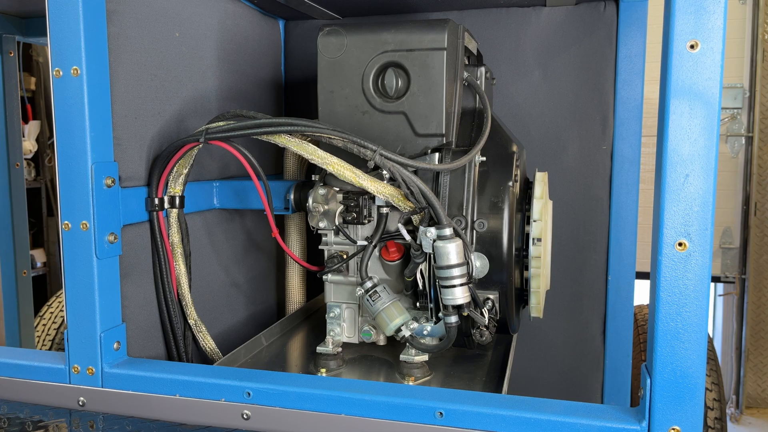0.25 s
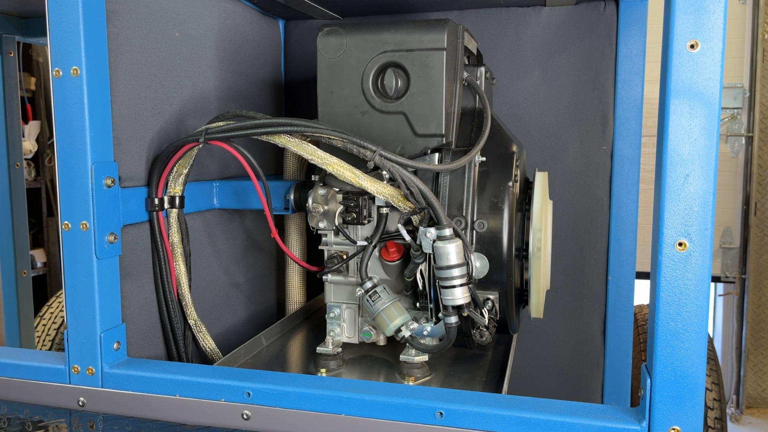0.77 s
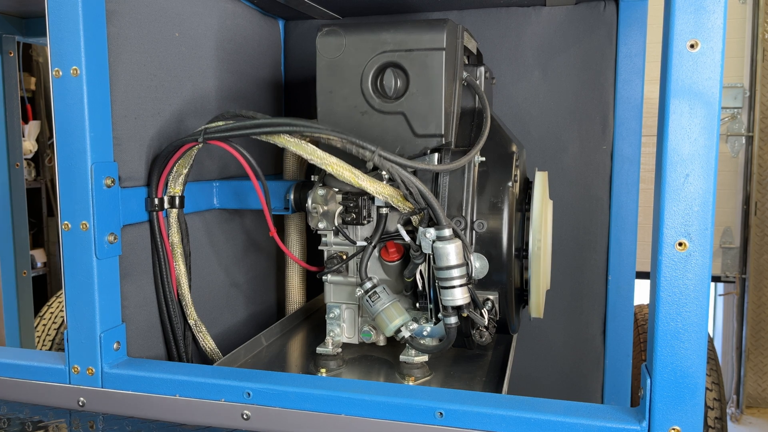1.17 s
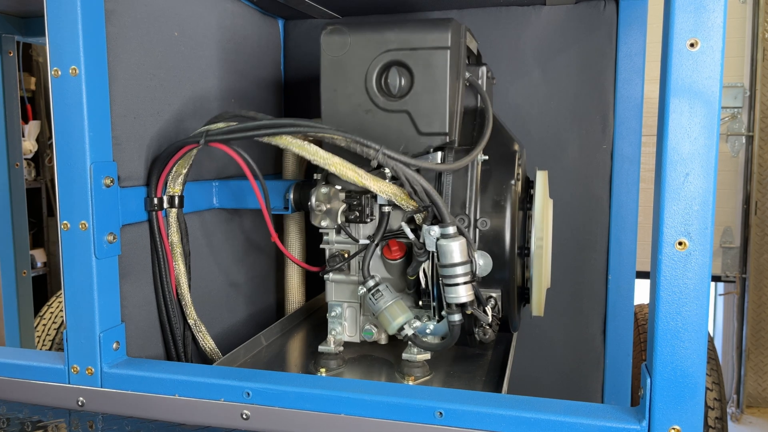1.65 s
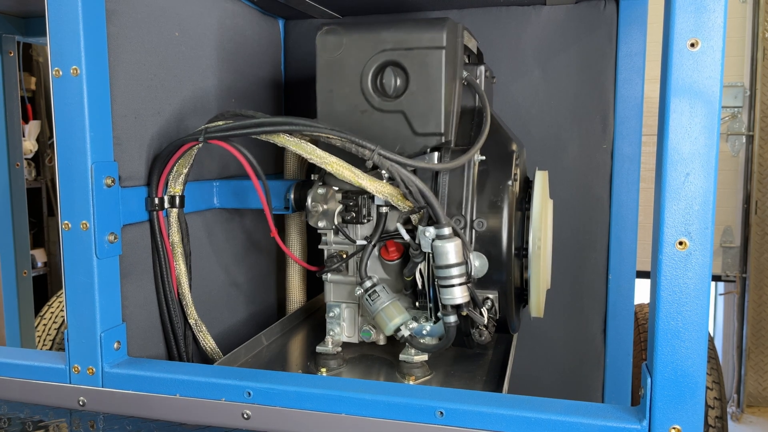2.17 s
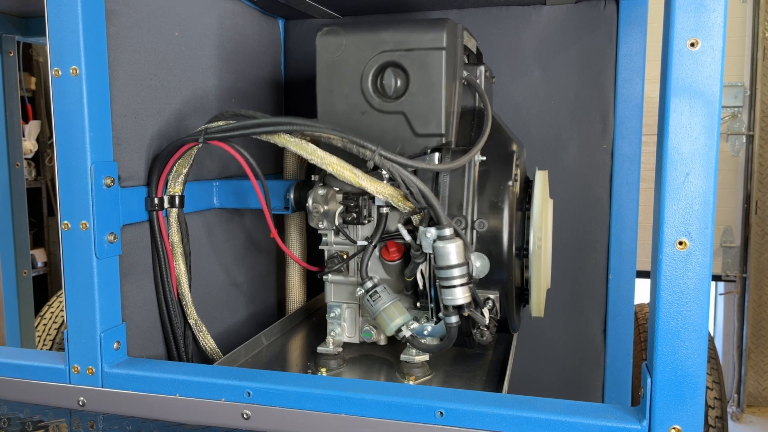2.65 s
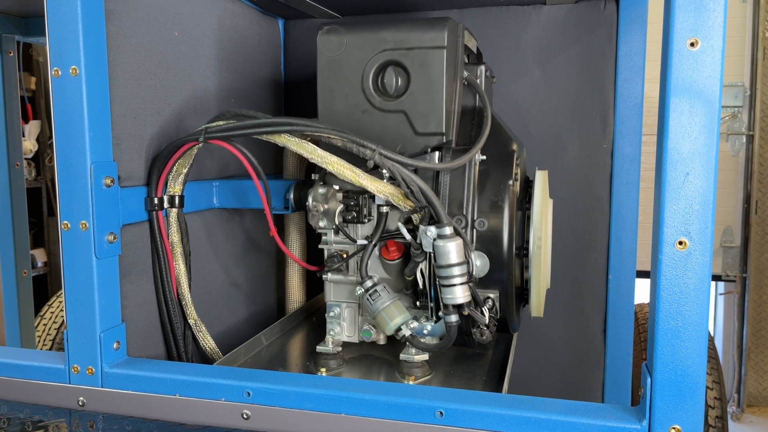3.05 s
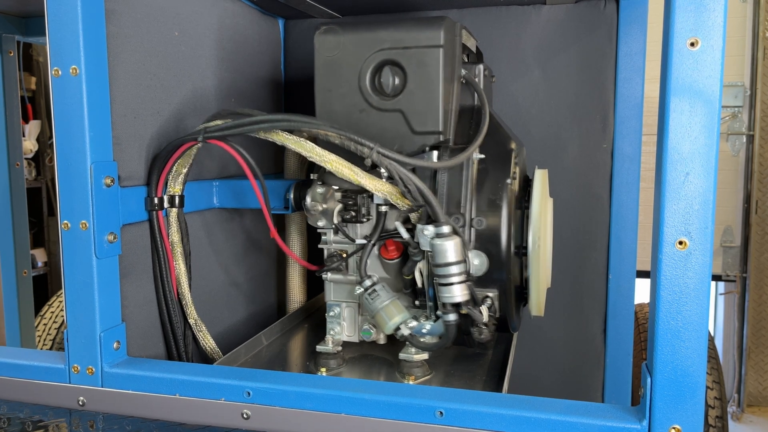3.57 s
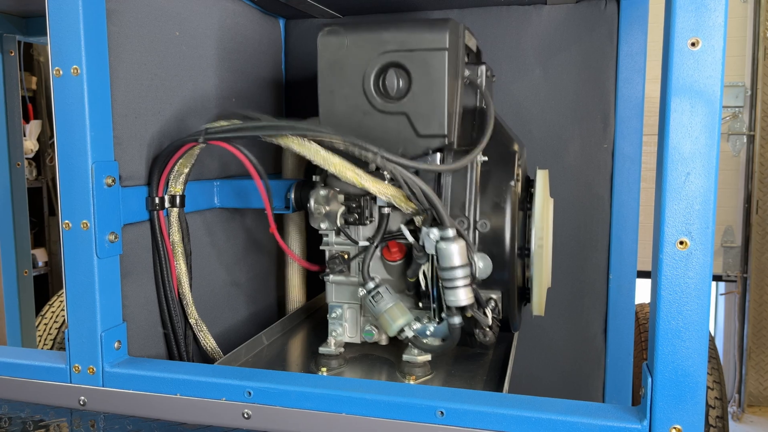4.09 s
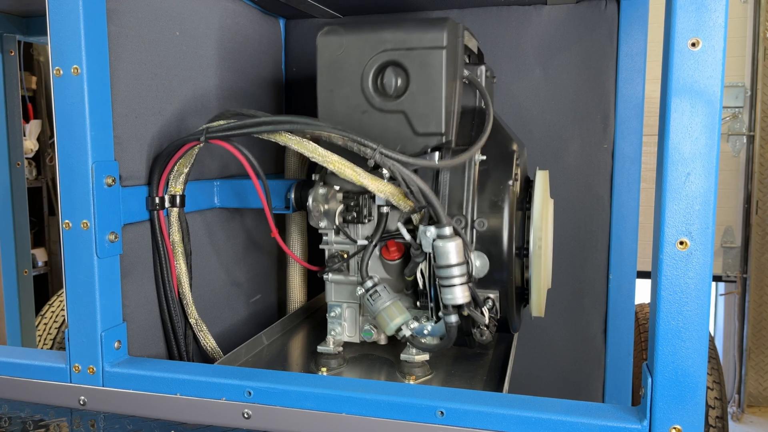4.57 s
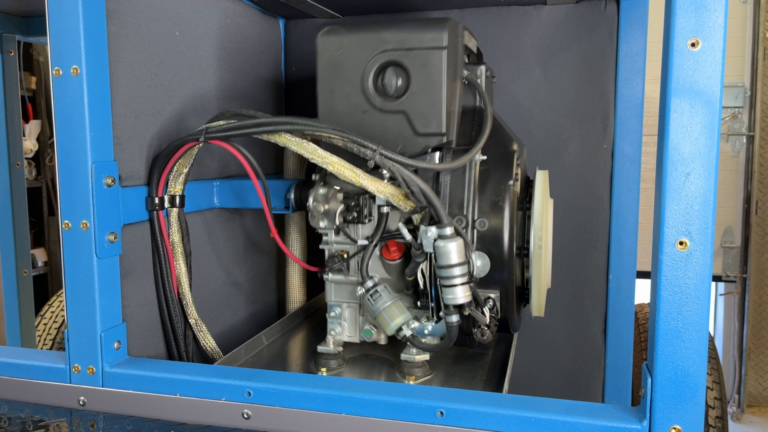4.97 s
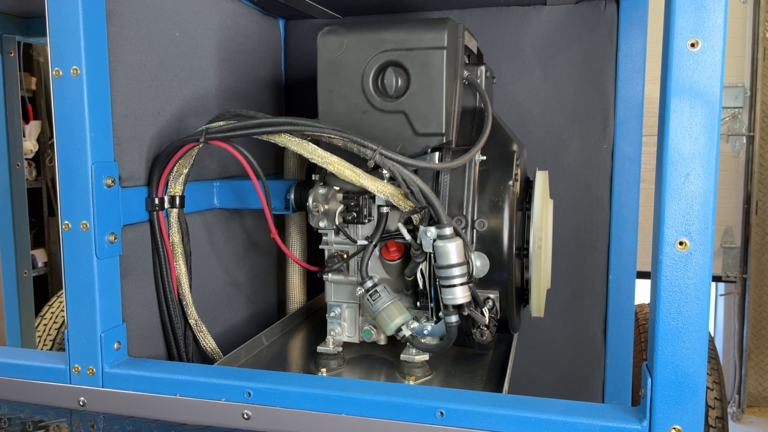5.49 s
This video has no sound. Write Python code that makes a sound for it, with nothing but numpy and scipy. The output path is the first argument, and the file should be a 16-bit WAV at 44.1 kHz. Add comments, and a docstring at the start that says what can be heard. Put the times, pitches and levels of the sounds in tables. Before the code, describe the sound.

A small single-cylinder diesel generator starts close to the microphone in a quiet yard. At first there is only a faint, low outdoor murmur. At about 0.6 seconds the starter engages with a metallic clunk and its gears whine upward in pitch, dragged down twice, near 1.0 and 1.25 seconds. The engine begins firing, and the whine cuts out with a click at 1.5 seconds. From about 2 to 3.5 seconds the engine coughs along slowly, with low exhaust pulses, ticking valves and rattling parts. At 3.5 seconds it catches with five hard knocks in quick succession, then speeds up steadily, growing fuller. A faint fan whine joins at around 4.5 seconds. By 5.3 seconds the knocking softens and the beats merge into an even, fast drone with clatter and light exhaust hiss, which continues to the end at about 5.7 seconds.

```python
"""In a quiet yard a small single-cylinder diesel generator starts in its steel frame, close to a two-port
microphone. The starter pinion clunks in and its gear teeth whine, dragged down by two compressions.
The engine coughs along at low speed, catches with five hard knocks and climbs to its running speed.
Each firing excites the modes of the block; gas pulses ring the pipes and the air box and merge into a
drone, while loose parts clatter and the exhaust hisses."""
import sys
import numpy as np
from scipy import signal
from scipy.fft import rfft, irfft, next_fast_len
from scipy.io import wavfile
from scipy.ndimage import uniform_filter1d

SR = 44100
rng = np.random.default_rng(int(sys.argv[2]) if len(sys.argv) > 2 else 0)


def file_out(sig):
    """Save sig as 16-bit WAV at sys.argv[1]."""
    # one column per channel
    cols = np.atleast_2d(sig).T
    # limit, then scale
    lim = np.clip(cols, -1, 1)
    pcm = np.round(lim * 32767).astype(np.int16)
    wavfile.write(sys.argv[1], SR, pcm)


N = 253001

# modes of the engine block: (f/Hz, width/Hz, gain/dB)
BLOCK_MODES = [(612, 34, -11), (758, 40, -6), (888, 40, -2), (1025, 60, -10), (1100, 40, 0), (1248, 50, -8),
               (1313, 50, -8), (1410, 70, -12), (1592, 45, -10), (1672, 45, -9), (1965, 70, -9),
               (2250, 120, -13), (2730, 60, -16), (3250, 220, -18), (3650, 240, -19), (4600, 200, -22),
               (5740, 60, -24)]
# broad response between the modes: (f/Hz, gain/dB)
BODY_RESPONSE = [(200, -24), (450, -20), (1100, -8), (1800, -18), (2900, -24), (4000, -26), (6000, -34),
                 (8200, -40), (11000, -44), (15500, -56)]
# onsets of coughs, misfires, slow idle, run-up, climb, last pull, easing off, even run: (t/s)
STAGE_ONSETS = [0, 1.89, 2.09, 3.92, 4.45, 4.853, 5.072, 5.25]


def amp(db):
    """Amplitude ratio of a level."""
    return 10 ** (np.asarray(db) / 20)


def unit_rms(x):
    """Normalisation to unit power."""
    return x / np.sqrt(np.mean(x ** 2) + 1e-20)


def at_hz(points, hz):
    """Interpolation over log frequency."""
    f, value = np.transpose(points)
    return np.interp(np.log(hz + 1), np.log(f + 1), value)


def curve(rows):
    """Interpolation over time: a soft gate for the table's span, and its columns at every sample."""
    times, *columns = np.transpose(rows)
    t = np.arange(N) / SR
    gate = uniform_filter1d(1. * (t > times[0]) * (t < times[-1] + .01), size=300)
    return gate, [np.interp(t, times, column) for column in columns]


def coloured(x, points):
    """Minimum-phase filter with the given spectrum."""
    log_gain = np.log(amp(at_hz(points, abs(np.fft.fftfreq(4096, 1 / SR)))))
    taps = np.fft.ifft(np.exp(log_gain - 1j * signal.hilbert(log_gain).imag)).real
    return signal.oaconvolve(x, taps[:2048])[:N]


def filtered(x, order, hz, kind):
    """Maximally flat pass filter."""
    return signal.sosfilt(signal.butter(order, hz, kind, fs=SR, output="sos"), x)


def ring(x, hz, width):
    """Damped resonator of gain 1, with its bandwidth in Hz."""
    r = np.exp(-np.pi * width / SR)
    return 2 * signal.lfilter([1 - r], [1, -r * np.exp(2j * np.pi * hz / SR)], x).real


def resonate(x, modes, damping=1):
    """Superposition of modes (f/Hz, width/Hz, gain/dB); damping scales the widths."""
    return sum(amp(db) * ring(x, hz, damping * width) for hz, width, db in modes)


def block(x):
    """Forced vibration of the casting: modes over a broad response."""
    return coloured(x, BODY_RESPONSE) + resonate(x, BLOCK_MODES)


def bursts(times, sizes, rise_s, decay_s):
    """Exponential rise and decay at each time."""
    train, t = np.zeros(N), np.arange(4000) / SR
    at = np.round(np.asarray(times) * SR).astype(int)
    np.add.at(train, at[at < N], (sizes * np.ones(len(at)))[at < N])
    return signal.oaconvolve(train, (1 - np.exp(-t / rise_s)) * np.exp(-t / decay_s))[:N]


def waver(count, depth_db, samples):
    """Random amplitude modulation for several partials."""
    return amp(depth_db * unit_rms(uniform_filter1d(rng.standard_normal((count, N)), size=samples)))


def at_phase(tops, phase):
    """Times of a phase (0-1) of the cycle between compression tops."""
    return tops[:-1] + phase * np.diff(tops)


def yard():
    """Ambient noise: distant air and traffic fade in as a low murmur."""
    fade_in = [(0.04, -79.5), (0.39, -71), (0.53, -64)]  # (t/s, level/dB)
    spectrum = [(18, -34), (30, -21), (129, -4), (176, -24), (253, -14.5), (346, -24), (662, -21.5),
                (754, -27), (3000, -38.5), (6000, -50), (15000, -55)]  # (f/Hz, level/dB)
    gate, (db,) = curve(fade_in + [(N / SR, fade_in[-1][1])])
    return gate * amp(db) * unit_rms(coloured(rng.standard_normal(N), spectrum))


def intake_hum():
    """Cavity resonance: while cranking, the intake stroke blows across the air box."""
    t = np.arange(N) / SR
    air = amp(-21) * (t > .92) * (t < 1.215) * rng.standard_normal(N)
    return ring(air, hz=615, width=25)


def starter():
    """Gear-mesh excitation: teeth and brush noise ring the housing; slowing gears groan in the block."""
    run = [(.62, 270.6, -51.5), (.682, 431, -37.5), (.754, 535.4, -34.5), (.828, 671.4, -33),
           (.896, 775.6, -32.5), (.925, 772, -33), (.942, 729, -29), (.953, 592, -34.5), (.962, 523.5, -35),
           (.985, 678.8, -36.5), (1.005, 756, -36), (1.056, 797, -33), (1.186, 906, -35),
           (1.212, 915, -32.5), (1.224, 818, -27.5), (1.236, 720, -30.5), (1.25, 436.6, -31),
           (1.264, 526, -33.5), (1.3, 778, -41), (1.43, 981, -38), (1.5, 1097, -39.5), (1.54, 1112, -70),
           (1.95, 1115, -78)]  # (t/s, mesh f/Hz, level/dB)
    housing_modes = [(270, 140, -22), (619, 31, -12), (1310, 50, -4), (1420, 90, -7), (1750, 40, -9),
                     (1960, 40, -6), (2265, 110, -2), (2750, 55, -8), (3360, 80, 1), (3620, 130, -3),
                     (4140, 90, -5), (4720, 65, -2), (5750, 40, -4), (6135, 65, -4), (10500, 900, -25),
                     (11900, 700, -27)]  # (f/Hz, width/Hz, gain/dB)
    mesh_orders = (1, 2, 2.5, 3, 4, 5, 6)  # (multiple of the mesh rate)
    mesh_levels = [-14, -3, -8, -0.5, -2, -5, -9]  # (level/dB) of each order
    gate, (hz, db) = curve(run)
    tonal_share = np.where(np.arange(N) / SR < 1.255, .3, .06)  # under load, then running free
    lag = np.exp(-1 / (.0067 * SR))
    slowing = np.maximum(-np.gradient(hz) * SR / 8800, 0)  # 1 at a fall of 8800 Hz/s
    strain = signal.lfilter([1 - lag], [1, -lag], slowing)
    groan = amp(-54) + amp(-40) * np.minimum(strain, 1) ** 2
    turns = np.cumsum(hz * (1 + .09 * uniform_filter1d(rng.standard_normal(N), size=200))) / SR
    partials = zip(mesh_orders, mesh_levels, waver(len(mesh_orders), depth_db=4, samples=700))
    teeth = unit_rms(sum(amp(level) * gain * np.cos(2 * np.pi * k * turns) for k, level, gain in partials))
    grit = rng.standard_normal(N) * (.12 + np.exp(-(turns % 1) / .37))
    drive = tonal_share * teeth + (1 - tonal_share) * unit_rms(grit)
    housing = amp(-20) * coloured(grit, BODY_RESPONSE) + resonate(drive, housing_modes)
    whine = amp(-27) * filtered(tonal_share / .3 * teeth, 4, (1300, 4300), "band")
    return gate * (amp(db) * unit_rms(housing + whine) + groan * unit_rms(block(drive + .5 * teeth)))


def clunks():
    """Impact excitation: pinion jolts ring the block and the air box and thud in the frame."""
    jolts = [(0.561, -42.5, -62, -50), (0.568, -31, -66, -39), (0.585, -34, -61, -35),
             (0.948, -42, -67, -43), (1.004, -35.5, -32, -40), (1.017, -46, -31, -45),
             (1.499, -33, -25, -7)]  # (t/s, blow/dB, thud/dB, tick/dB), each level on its own scale
    modes = [(313, 60, 13.3), (434, 140, 8.3), (616, 42, 22), (1380, 270, 10.3)]
    times, blow_db, thud_db, tick_db = np.transpose(jolts)
    blow = bursts(times, amp(blow_db), .0012, .02) * rng.standard_normal(N)
    tick = bursts(times, amp(tick_db), .00018, .0019) * rng.standard_normal(N)
    thud = ring(np.gradient(bursts(times, amp(thud_db), .0019, .0042)), hz=85, width=44)
    clunk = amp(-5.5) * block(blow) + amp(-6) * coloured(blow, BODY_RESPONSE) + resonate(blow, modes)
    click = amp(-1.5) * ring(tick, hz=1270, width=500) + coloured(tick, BODY_RESPONSE)
    return clunk + click + amp(53.5) * thud


def clatter(tops):
    """Random impacts: moving parts rattle, harder after each firing."""
    noise = rng.standard_normal(N)
    grains = amp(3 * np.minimum(rng.exponential(1, N), 5)) * (rng.random(N) < 1500 / SR)
    rattle = unit_rms(noise + .5 * unit_rms(grains * np.sign(noise)))
    spectrum = [(30, -30), (90, -10), (300, -5), (700, -9), (1500, -11), (3000, -16), (4500, -20),
                (6300, -26), (8000, -36), (15500, -70)]  # (f/Hz, level/dB)
    sound = unit_rms(coloured(rattle, spectrum)) + amp(-21) * unit_rms(block(rattle))
    return sound * (.89 + .87 * bursts(tops, .74, .0012, .011))


def exhaust_hiss(tops):
    """Flow noise: the exhaust puffs at each firing."""
    spectrum = [(3000, -45), (6500, -4.5), (8000, 1), (10500, -5.5), (13500, -12.5), (15500, -7.5)]  # (f/Hz, level/dB)
    puff = 1 + 2.16 * bursts(tops - .004, .84, .0013, .0063)
    return unit_rms(coloured(rng.standard_normal(N), spectrum)) * puff


def exhaust_chirps(tops):
    """Aerodynamic whistle: hot gas squeezes past the opening exhaust valve in a short falling tone."""
    out, t = np.zeros(N), np.arange(0, .009, 1 / SR)
    for top, (pitch_scatter, level_scatter) in zip(tops, rng.standard_normal((len(tops), 2))):
        if 3.85 < top < 5.03:
            load = np.exp(-((top - 4.4) / .55) ** 2)
            hz = 10000 + 1140 * load ** 16 + 210 * pitch_scatter - 2600 * t / t[-1]
            envelope = amp(-35.5 + 2 * level_scatter) * np.sqrt(load) * np.hanning(len(t))
            start = round((top + .0125) * SR)
            out[start:start + len(t)] += envelope * np.sin(2 * np.pi * np.cumsum(hz) / SR)
    return out


def air_box(tops):
    """Cavity resonance: each stroke sets the air box humming."""
    phases = (0, .36, .49, .8)  # (phase/cycles) of the four strokes
    stroke_levels = [(-5.5, -2.5, -2, -3), (-6, -24, -2.5, -14), (-0.5, -6, -1.5, -11.5),
                     (-6, -13, 4.5, 1.5), (0, -20, -3.5, 5), (-2, -2, -16, -8), (-25, -13, 2, -1),
                     (-15, 0, 1, -18)]  # a row per stage: (level/dB of each stroke)
    times = np.concatenate([at_phase(tops, phase) for phase in phases])
    sizes = amp(np.array(stroke_levels)[np.searchsorted(STAGE_ONSETS, tops[:-1]) - 1].T.ravel())
    flow = rng.standard_normal(N) * (.055 + .5 * bursts(times, sizes, .00045, .0022))
    pulses = 2 * bursts(times, sizes, .0001, .00015)
    return unit_rms(ring(flow + pulses, hz=618, width=30))


def pipes(tops):
    """Air-column resonance: pressure pulses at set crank angles ring the intake and exhaust pipes."""
    pulses = [(0.3, -7, -4, 74, 49, -1), (.565, 2.5, -13, 82.5, 30, 1), (0.6, -18, -0.5, 155.4, 28.5, 1),
              (.825, -3, -13, 110, 40, -1), (.2, -10, 4, 62.2, 29, 1)]  # (phase/cycles, slow level/dB, fast level/dB, f/Hz, width/Hz, sign)
    speed = np.clip((1 / np.diff(tops) - 9) / 16, 0, 1)  # 0 at idle, 1 at running speed
    scatter, out = rng.standard_normal((len(speed), len(pulses))), np.zeros(N)
    for k, (phase, slow_db, fast_db, hz, width, sign) in enumerate(pulses):
        size = amp(slow_db + speed * (fast_db - slow_db) + (2 - 1.3 * speed) * scatter[:, k])
        push = np.gradient(bursts(at_phase(tops, phase), sign * size, .0036, .0017))
        push += amp(-54) * rng.standard_normal(N)  # turbulence keeps the pipe rumbling
        out += ring(push, hz, width) / width + amp(-93) * push
    out = filtered(out, 2, 45, "high")
    merged = np.interp(np.arange(N) / SR, tops[:-1], speed)  # at speed the pulses give way to the drone
    return amp(-12 * merged) * out / np.sqrt(uniform_filter1d(out ** 2, size=9000) + 1e-16)


def fan_whine(turns):
    """Rotational tones: gears or fan blades sound high orders, and air noise rings the fan shroud."""
    swell = [(4.4, -66), (4.7, -56), (4.9, -52), (5.2, -52), (5.5, -53), (5.74, -53)]  # (t/s, level/dB)
    orders = [(34, -4), (38, 1.5), (42, 1), (51, -6)]  # (multiple of the cycle rate, level/dB)
    shroud_modes = [(2010, 84, -4), (2230, 120, 1), (4230, 200, -2.5)]  # (f/Hz, width/Hz, gain/dB)
    gate, (swell_db,) = curve(swell)
    gains = waver(len(orders), depth_db=2, samples=1500)
    tones = sum(gain * amp(db) * np.sin(2 * np.pi * k * turns) for (k, db), gain in zip(orders, gains))
    air = amp(.5) * unit_rms(resonate(rng.standard_normal(N), shroud_modes))
    return np.sqrt(2) * gate * amp(swell_db) * (tones + air)


def drone(turns):
    """Harmonic series: low orders of the cycle, locked in phase, pass through the silencer."""
    swell = [(3.55, -14.5), (3.8, -13), (4.05, -6.5), (5.74, -5.5)]  # (t/s, level/dB)
    order_levels = [1, 11, 4, -10, -9, 5, -7, 8.5]  # (level/dB) of orders 2 to 9
    silencer = [(20, -95), (30, -64), (45, -46.5), (57, -36), (68, -45), (90, -37.5), (112, -40.5),
                (150, -43.5), (175, -53.5), (230, -57.5)]  # transmission: (f/Hz, gain/dB)
    gate, (swell_db,) = curve(swell)
    cycle_hz = np.gradient(turns) * SR
    tones = sum(-amp(swell_db + db + at_hz(silencer, k * cycle_hz)) * np.sin(2 * np.pi * k * turns)
                for k, db in enumerate(order_levels, start=2))
    return np.sqrt(2) * gate * tones


def valve_ticks(tops):
    """Impact excitation: the valve gear rings the rocker cover and block, more softly at speed."""
    impacts = [(.375, -31), (.5, -30), (.68, -32)]  # (phase/cycles, level/dB)
    scatter = rng.standard_normal((len(tops) - 1, len(impacts)))
    drop_db = 7 + .3 * (1 / np.diff(tops) - 9)
    envelope = sum(bursts(at_phase(tops, phase), amp(db - drop_db + .6 * scatter[:, k]), .00018, .0033)
                   for k, (phase, db) in enumerate(impacts))
    ticks = envelope * rng.standard_normal(N)
    cover = ring(ticks, hz=3430, width=480) + ring(ticks, hz=1410, width=70)
    return amp(13) * cover + amp(-24.5) * filtered(block(ticks), 2, 2500, "high")


def knocks(tops, db, crack_db):
    """Combustion knock: the sudden pressure rise shakes and strikes the block."""
    # weak burning swells gently; a strong firing adds a sharp front
    swell = 3.3 * bursts(tops - .003, amp(db), .0045, .0034)
    front = bursts(tops, amp(2 * db + 10.5), .0029, .0071)
    blow = (swell + front) * rng.standard_normal(N)
    casting = amp(-1) * resonate(blow, BLOCK_MODES[1:], damping=1.94)
    casting += amp(9.5) * coloured(blow, BODY_RESPONSE)
    head = amp(-7) * (ring(blow, hz=1450, width=400) + ring(blow, hz=2020, width=450))
    shake = filtered(casting + head, 4, 720, "high")
    # a heavy strike and two bright slaps, the second as the piston swings back
    strike = bursts(tops, amp(2.13 * db + 53), .000038, .000063)
    slaps = np.gradient(bursts(np.r_[tops, tops + .00645], amp(np.r_[db, db] + 31.5), .00005, .0001))
    clang = sum((-1) ** k * amp(gain_db) * ring(strike + slaps, hz, .95 * width)
                for k, (hz, width, gain_db) in enumerate(BLOCK_MODES[1:]))
    crack = bursts(tops - .003, amp(crack_db), .0047, .0017) * rng.standard_normal(N)
    return clang + shake + amp(22) * filtered(block(crack), 2, 2500, "high")


def exhaust_kicks(tops, db):
    """Rarefaction pulses: from the run-up on, each firing kicks a dull dip out of the exhaust."""
    kick = bursts(tops - .004, amp(db + 10) * (tops > 3.92), .0022, .0021)
    return -filtered(kick, 1, 50, "high")


def firings():
    """Speed integrates to phase: each whole cycle gives a compression top, a knock and a crack level."""
    speed = [(1.235, 5.14), (1.4, 6.57), (1.6, 9.32), (1.9, 10.72), (2.05, 10.15), (2.6, 9.48), (3.5, 8.74),
             (3.7, 11.45), (3.95, 13.89), (4.2, 17.33), (4.5, 19.24), (4.8, 21.12), (5.05, 23.7),
             (5.2, 24.47), (5.35, 24.66), (5.5, 25.17), (5.74, 25.44)]  # (t/s, cycle rate f/Hz)
    burning = [(-20, -41, 0), (-30.5, -16, 7), (-23, -27, 1.02), (-25, -15, 1.5), (-24, -20, 1.5),
               (-22, -32, 2), (-27.5, -27, 1.5), (-43, -27.5, 5)]  # a row per stage: (knock level/dB, crack level/dB, scatter/dB)
    standouts = [(1.234, -23.5, -40), (1.406, -22.5, -4), (1.54, -17, -42), (1.65, -19.5, -40),
                 (1.75, -20.5, -35), (1.847, -21, -40), (3.531, -16, -40), (3.632, -16, -33),
                 (3.722, -15.5, -38), (3.803, -15.5, -40), (3.883, -15.5, -13), (4.026, -21, -34),
                 (4.152, -20.5, -40), (4.431, -40, -14), (4.876, -21, -17)]  # single compressions that stand out, most of them firings: (t/s, knock level/dB, crack level/dB)
    t = np.arange(speed[0][0], N / SR + .3, 1 / SR)
    turns = np.cumsum(np.interp(t, *np.transpose(speed))) / SR
    tops = np.interp(np.arange(turns[-1] // 1), turns, t)
    db, crack_db, scatter_db = np.array(burning)[np.searchsorted(STAGE_ONSETS, tops) - 1].T
    db, crack_db = np.array([db, crack_db]) + scatter_db * rng.standard_normal((len(tops), 2)).T
    for firing in standouts:
        nearest = abs(tops - firing[0]).argmin()
        tops[nearest], db[nearest], crack_db[nearest] = firing
    return tops, db, crack_db


def engine():
    """Superposition of gas and mechanical sources, all timed by the crank."""
    levels = [(1.24, -39, -46, -43), (1.32, -39, -44, -37), (1.63, -42.5, -34, -38),
              (1.75, -37.5, -36, -40.5), (2.08, -45.5, -38, -39.5), (2.45, -45, -40, -39.5),
              (2.62, -46, -41, -48), (2.84, -44, -39.5, -55.5), (3.47, -46.5, -40.5, -51),
              (3.57, -42.5, -39.5, -36), (3.83, -38.5, -34.5, -42), (4.1, -40.5, -28.5, -44),
              (4.52, -37.5, -27, -48.5), (4.82, -39, -26, -48), (4.97, -37.5, -21.5, -49),
              (5.6, -40.5, -31.5, -55.5), (5.74, -40.5, -27, -60)]  # (t/s, clatter level/dB, pipe level/dB, air box level/dB)
    tops, db, crack_db = firings()
    gate, (clatter_db, pipe_db, box_db) = curve(levels)
    hiss_db = -48.5 + 1.24 * (clatter_db + 37)  # follows the clatter, more steeply
    running = amp(clatter_db) * clatter(tops) + amp(hiss_db) * exhaust_hiss(tops)
    running += amp(box_db) * air_box(tops) + amp(pipe_db) * pipes(tops)
    blows = knocks(tops, db, crack_db) + valve_ticks(tops) + exhaust_kicks(tops, db)
    turns = np.interp(np.arange(N + 4000) / SR, tops, np.arange(len(tops)))
    turns = uniform_filter1d(turns, size=6000, mode="nearest")[:N]  # smoothed count of cycles
    return gate * running + blows + drone(turns) + fan_whine(turns) + exhaust_chirps(tops)


def diffuse_echoes(sound, size):
    """Diffuse reflection: the spectrum of short echoes at each port, which widen the sound."""
    patterns, changes_per_s, reverb_s = 6, 7, .055
    taps = np.zeros((patterns, 2, 6000))
    delays = np.arange(40, 5980, 20) + rng.integers(0, 20, (patterns, 2, 297))
    gains = rng.choice([-1., 1.], delays.shape) * amp(-60 * delays / SR / reverb_s)
    np.put_along_axis(taps, delays, gains, 2)
    taps /= np.linalg.norm(taps, axis=2, keepdims=True)
    # random patterns crossfade at equal power to keep the tone even
    turn = (np.arange(N) / SR * changes_per_s - np.arange(patterns)[:, None]) % patterns
    pieces = rfft(sound * np.sin(np.pi / 2 * np.minimum(turn, 2)), size)
    return (pieces[:, None] * rfft(taps, size)).sum(0)


def scene():
    """Direct and reflected sound add at two ports, which differ in phase and level."""
    direct_share = [(60, 1), (130, .99), (250, .93), (500, .85), (1200, .7), (2200, .8), (4000, .65),
                    (6500, .85), (8300, .99), (11000, .72), (15000, .7)]  # (f/Hz, share of the power)
    left_lead = [(0, 0), (1400, -.1), (2000, 0), (3450, .8), (4650, .5), (5430, -.8), (6370, -1.1),
                 (7670, -2.8), (8300, -3.14), (8870, -3.4), (11100, -6.1), (13000, -6.5), (14600, -9.3)]  # (f/Hz, phase/rad)
    left_excess = [(60, -0.5), (130, -0.5), (290, -0.5), (640, -3.0), (1410, -2.5), (3100, 1.0),
                   (6820, 1.5), (15000, 0.0)]  # (f/Hz, left minus right level/dB)
    sound = yard() + starter() + intake_hum() + clunks() + engine()
    size = next_fast_len(N + 6000)
    hz, side = np.fft.rfftfreq(size, 1 / SR), np.array([[.5], [-.5]])
    share = at_hz(direct_share, hz)
    direct = rfft(sound, size) * np.exp(1j * side * at_hz(left_lead, hz))
    ports = np.sqrt(share) * direct + np.sqrt(1 - share) * diffuse_echoes(sound, size)
    return irfft(ports * amp(side * at_hz(left_excess, hz)), size)[:, :N]


def record(dry):
    """Low-pass filtering: the top treble rolls off above 14 kHz, then stops sharply."""
    soft = filtered(dry, 12, 14100, "low")
    band_limit = signal.firwin(511, 15730, window=("kaiser", 9), fs=SR)
    return signal.oaconvolve(soft, band_limit[None], "same")


dry = scene()
out = record(dry)
file_out(out)
```